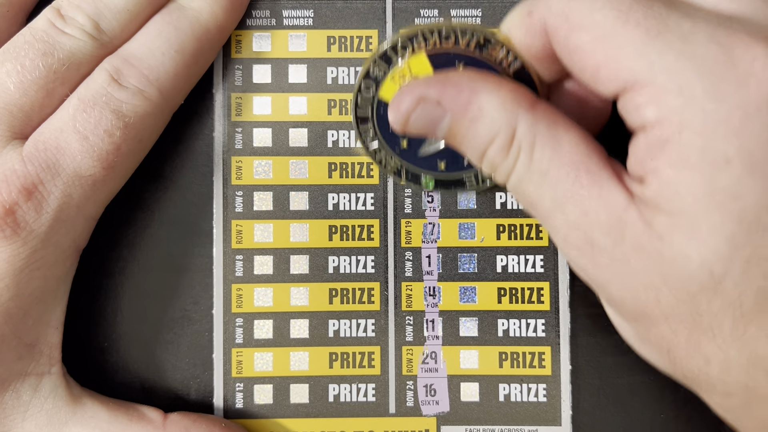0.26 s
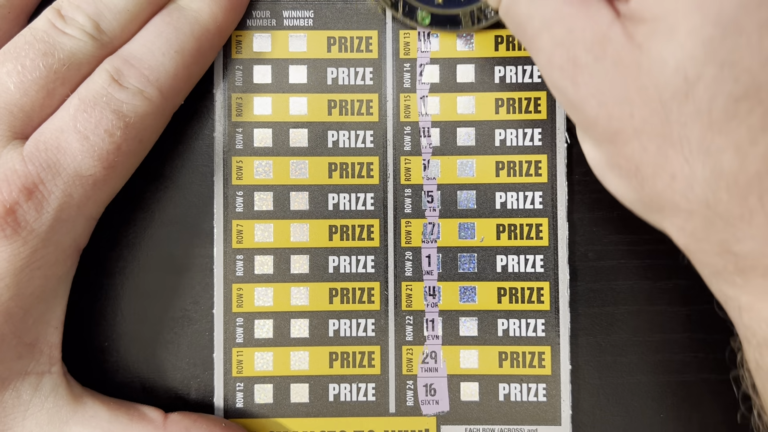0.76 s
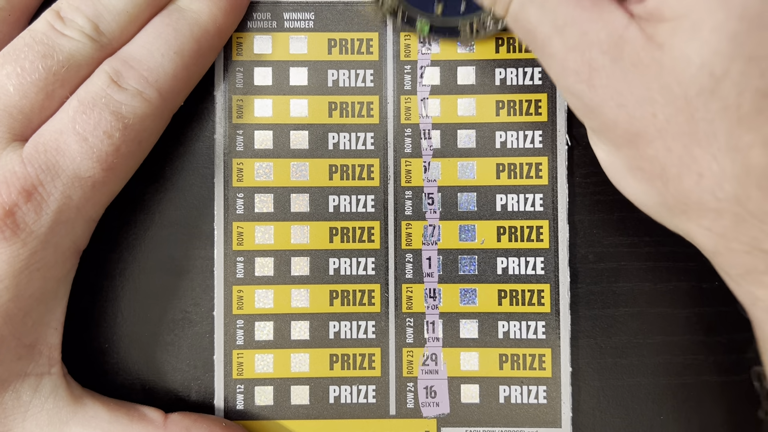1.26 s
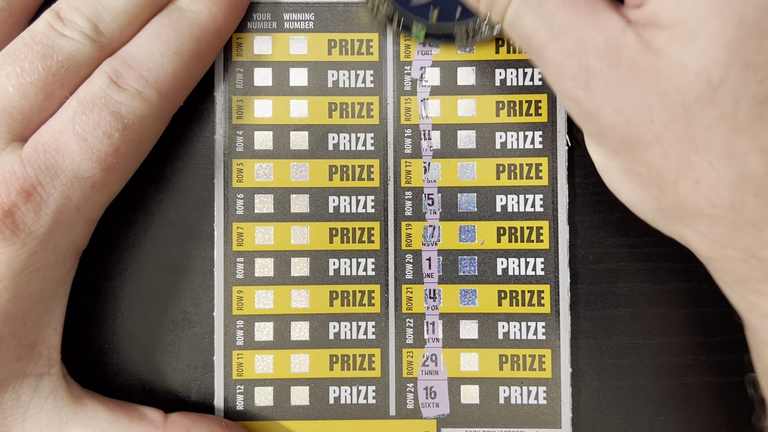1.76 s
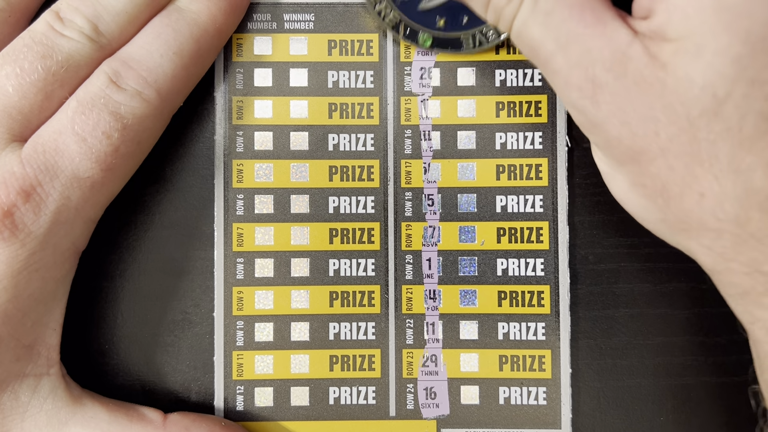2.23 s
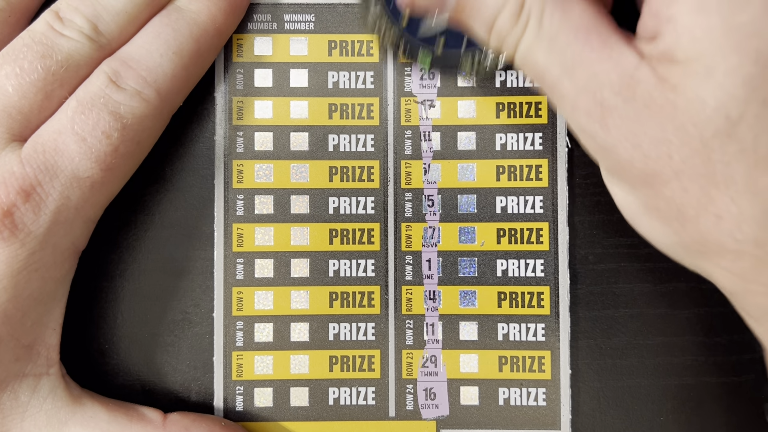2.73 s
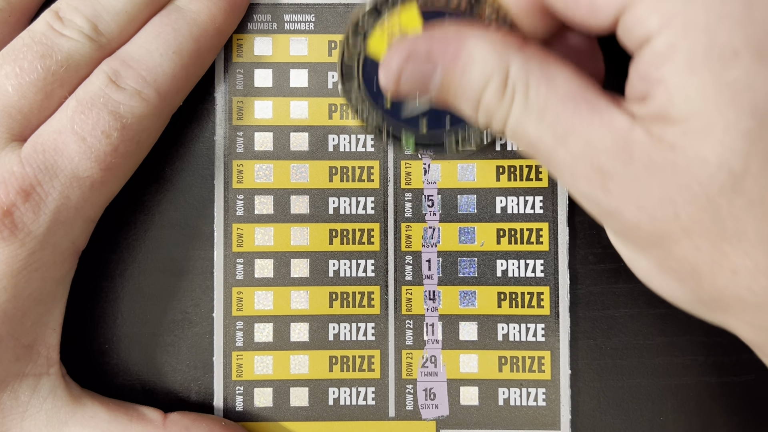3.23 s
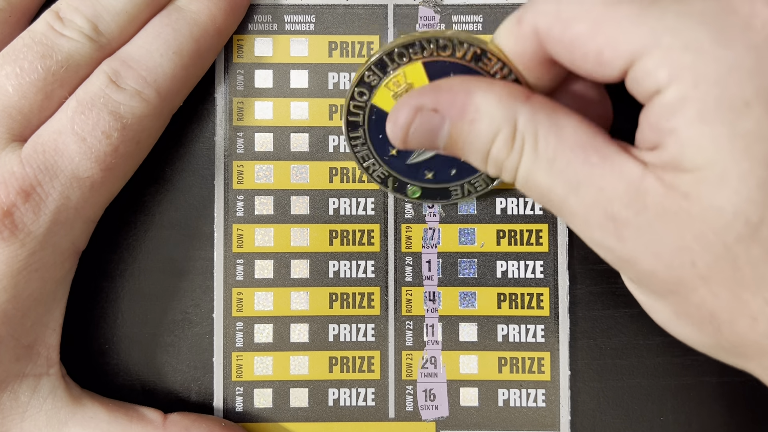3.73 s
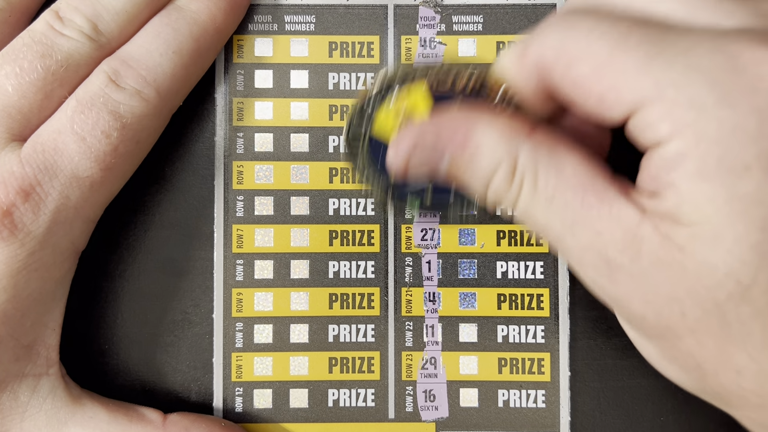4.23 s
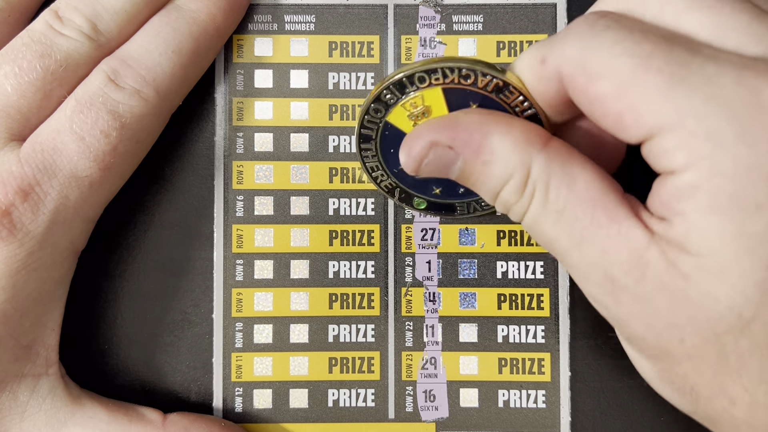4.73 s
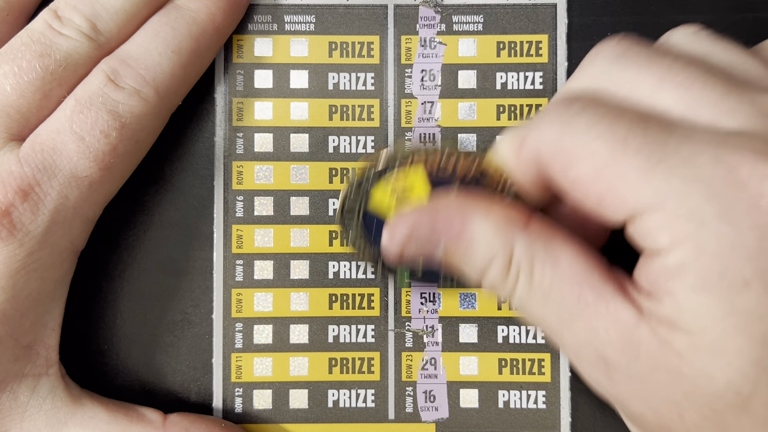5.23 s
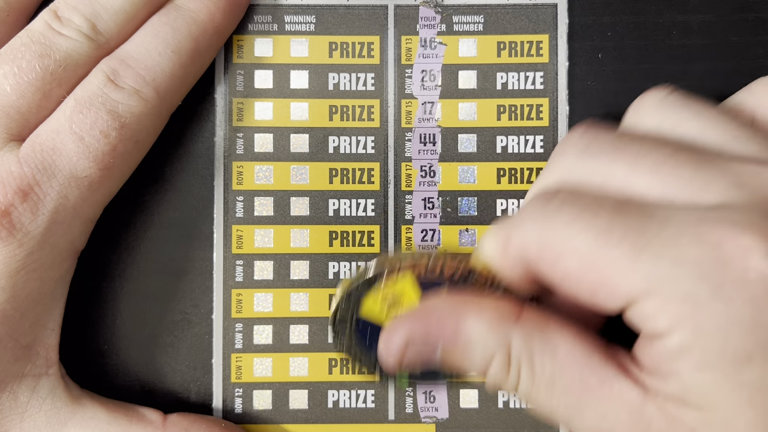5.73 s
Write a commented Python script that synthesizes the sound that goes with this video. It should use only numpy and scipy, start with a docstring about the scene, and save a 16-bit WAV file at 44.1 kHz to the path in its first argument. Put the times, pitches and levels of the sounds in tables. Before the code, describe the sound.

A coin scrapes across a scratch card in one long slide, pauses briefly, then scratches rapidly back and forth with small clicks.

```python
"""Coin on a scratch card

A large coin scrapes the coating off a card held flat on a table, close by in a small, quiet room:
one long slide up the card, a short rest, then push-pull strokes, about nine a second.
Stick-slip friction at the rim drives the modes of card and table; the coating fractures into fine
grit, whose impacts ring the coin. Now and then the rim snags, cracks off a flake and knocks."""
import sys
import numpy as np
from scipy import signal
from scipy.fft import rfft, irfft, next_fast_len
from scipy.io import wavfile
from scipy.ndimage import uniform_filter1d, map_coordinates

SR = 44100
rng = np.random.default_rng(int(sys.argv[2]) if len(sys.argv) > 2 else 0)


def generate_wav(signal):
    """Clip the signal to [-1, 1] and save it as 16-bit WAV at the path in sys.argv[1]."""
    frames = np.transpose(np.atleast_2d(signal))
    scaled = np.clip(frames, -1, 1) * 32767
    pcm = np.round(scaled).astype(np.int16)
    wavfile.write(sys.argv[1], SR, pcm)


N = 264371
TIME = np.arange(N) / SR
FFT_SIZE = next_fast_len(N + SR // 2)
FREQ = np.maximum(np.arange(FFT_SIZE // 2 + 1) * SR / FFT_SIZE, 1)
CUTOFF_HZ = 15900
WAYS = PUSH, PULL, SLIDE = 0, 1, 2

# Strokes, pull and push in turn, at relative levels: start_s, deepest_after_s, card_db, grit_db
STROKES = [(1.044, 0.011, -45.5, -60.5), (1.105, 0.076, -38.0, -52), (1.248, 0.026, -38, -51),
           (1.365, 0.045, -32.0, -52), (1.479, 0.036, -39, -51.0), (1.589, 0.051, -31.5, -44),
           (1.699, 0.062, -39.5, -53.5), (1.819, 0.051, -30, -49.5), (1.947, 0.023, -33.5, -46),
           (2.047, 0.045, -33, -47), (2.156, 0.064, -36.0, -47.5), (2.284, 0.034, -33, -43.5),
           (2.392, 0.067, -35, -44.5), (2.503, 0.048, -30, -44.5), (2.624, 0.028, -35, -47),
           (2.719, 0.064, -28.5, -46), (2.84, 0.037, -34, -43), (2.957, 0.063, -27.5, -45.5),
           (3.067, 0.03, -32.5, -44.0), (3.174, 0.059, -30, -41), (3.31, 0.031, -32.5, -49.5),
           (3.417, 0.043, -27.5, -42.5), (3.527, 0.027, -31.5, -38), (3.634, 0.056, -28, -45.5),
           (3.745, 0.048, -32.5, -45), (3.844, 0.06, -29.5, -41.5), (3.971, 0.014, -31.0, -43.5),
           (4.077, 0.062, -28, -41.5), (4.2, 0.016, -28.5, -41.5), (4.308, 0.053, -25, -43.5),
           (4.427, 0.03, -31.5, -50), (4.54, 0.059, -26.5, -47.5), (4.653, 0.055, -33.5, -46.5),
           (4.764, 0.064, -26.5, -45), (4.898, 0.02, -30, -50.5), (4.985, 0.066, -30, -42),
           (5.101, 0.063, -35.5, -42), (5.221, 0.07, -30, -44.5), (5.356, 0.024, -34.0, -45),
           (5.449, 0.063, -30, -47), (5.58, 0.052, -33, -48.5), (5.678, 0.053, -27.5, -52.5),
           (5.793, 0.026, -28.5, -49), (5.916, 0.045, -26.0, -53)]
# Place of the coin, down the card from its middle: time_s, offset_card_lengths
TRAVEL = [(0, 0), (1, -.5), (2.5, -.5), (6, .5)]


def scrape():
    """Friction excitation: slips and rubbing shake the card; each slip sheds grit that rings the coin."""
    direction, card_db, grit_db, upper_db, sparkle_db, ring_db, ring_hz = hand()
    jumps = slips(median_per_s=260, unevenness=.6, spread_db=5)
    force = rms_one(jumps) + from_db(-2) * grains(per_s=3000, spread_db=2.5)
    bursts = rms_one(decay(jumps, fade_s=.0069))
    crumbs = grains(per_s=25000, spread_db=2) * (.1 + .9 * bursts)
    card = card_rasp(force, direction, upper_db)
    grit = grit_hiss(crumbs, direction, sparkle_db)
    ring = coin_ring(crumbs, ring_hz, width_hz=130)
    bright = from_db(-1) * grit + from_db(ring_db + 1) * ring
    return from_db(card_db - .5) * card + from_db(grit_db) * bright


def slips(median_per_s, unevenness, spread_db):
    """Stick-slip motion: the rim jumps forward at uneven intervals and with uneven force."""
    interval, strength = rng.standard_normal((6000, 2)).T
    at = (np.cumsum(np.exp(unevenness * interval)) / median_per_s * SR).astype(int)
    heard = at < N
    return np.bincount(at[heard], from_db(spread_db * strength[heard]), N)


def hand():
    """Contact loading: direction, grip and depth of cut govern the level and colour of the friction."""
    # The long slide, at relative levels: time_s, card_db, grit_db, upper_modes_db, sparkle_db, ring_db
    long_slide = [(0.021, -66, -65.5, 1, -8, -17), (0.022, -31.5, -41.5, 4.5, -14, -16),
                  (0.086, -38, -59, -12, -14, -14), (0.206, -40.5, -56, -1, -7, -12),
                  (0.22, -35.5, -45, 1.5, -0.5, -7), (0.305, -31.5, -44.5, 6.5, -5.5, -18),
                  (0.36, -36, -51.5, 3.5, -3.5, -8), (0.604, -39.5, -59, 1, -5, -8.5),
                  (0.66, -36.5, -50.5, 4, -5, -4), (0.848, -39.5, -56.5, 2, -11, -3),
                  (0.876, -59, -76, 2, 1, -10), (1.03, -69.5, -91, 5, 2, -11)]
    # Colour of the grip on a push, then on a pull: upper_modes_db, sparkle_db, ring_db
    grip = [(-.5, -3.5, -10), (.5, -3, -8)]
    # Lean of the coin, which lowers its ring on a push and raises it otherwise: time_s, shift_hz
    lean = [(0.5, 20), (0.6, 180), (1.6, 180), (2.4, 62), (4.0, 26), (5.4, 150)]
    start_s, deepest_s, card_db, grit_db = np.transpose(STROKES)
    way = np.resize([PULL, PUSH], len(start_s))
    now = np.searchsorted(start_s, TIME) - 1
    sliding = now < 0
    direction = np.where(sliding, SLIDE, way[now])
    press_s = np.where(way == PUSH, .035, .042)
    hold_s = np.where(way == PUSH, .001, .013)
    upper_db, sparkle_db, ring_db = np.array(grip)[way].T
    depth_db = grit_db + 44  # a deeper cut than usual wakes the upper modes and the ring
    clean_db = grit_db - card_db + 9.5  # more grit over the card makes a stroke brighter
    strokes = [stroke_level(press_s, deepest_s + hold_s, card_db, dip_db=22, bite=5, ease=1.81),
               stroke_level(deepest_s, deepest_s + .0035, grit_db, dip_db=29, bite=2.95, ease=1.51),
               (upper_db + .42 * depth_db)[now],
               (sparkle_db + .37 * clean_db)[now],
               (ring_db + .23 * depth_db)[now]]
    slide_s, *slide = np.transpose(long_slide)
    card, grit, upper, sparkle, ring = (np.where(sliding, np.interp(TIME, slide_s, points), stroke)
                                        for points, stroke in zip(slide, strokes))
    patch = drift(per_s=60) * np.where(sliding, .5, 1)  # thick coating gives more and brighter grit
    ring_hz = 4233 + np.where(direction == PUSH, -1, 1) * over_time(lean)
    return direction, card, grit + 2 * patch, upper, sparkle + 3 * patch, ring, ring_hz


def stroke_level(rise_s, held_s, level_db, dip_db, bite, ease, last_turn_s=6.03):
    """Static and sliding friction: the coin sticks at each turn, breaks free, bites and slows; in dB."""
    starts = np.array(STROKES)[:, 0]
    lengths = np.diff(starts, append=last_turn_s)
    held = np.minimum(held_s, .85 * lengths)
    now = np.maximum(np.searchsorted(starts, TIME) - 1, 0)
    age = TIME - starts[now]
    building = np.clip(1 - age / rise_s[now], 0, 1) ** bite
    release = np.clip((age - held[now]) / (lengths - held)[now], 0, 1)
    slowing = np.sin(np.pi / 2 * release) ** ease
    return level_db[now] - dip_db * (building + slowing)


def card_rasp(force, direction, upper_db):
    """Forced vibration of card and table; further down the card it narrows to the middle modes."""
    card = sum((direction == way) * through(force, card_response(way, soft_hz=2450)) for way in WAYS)
    travel = over_time(TRAVEL)
    card = wander(card, share=.0226, per_s=14)
    card = shelf(card, corner_hz=750, high_db=upper_db)
    card = shelf(card, corner_hz=348, high_db=8 * travel)
    card = shelf(card, corner_hz=1070, high_db=18 * travel)
    return steady(shelf(card, corner_hz=1400, high_db=-30 * travel))


def card_response(way, soft_hz):
    """Modal superposition in card and table; the compliant paper low-passes the contact force."""
    # Modes of card and table: pitch_hz, width_hz, push_db, pull_db, slide_db
    card_modes = [(141.4,17.5,-7.5,-14,-8.5), (266.6,25.7,-5,-9.5,-8.5), (309.5,49.7,-3,-7.5,-7.5),
                  (429,64,-6.5,-10.5,-13.5), (520,47.7,-2.5,-7.5,-9.5), (628.6,54.7,2,-0.5,-6.5),
                  (706,72,-4,-2.5,-9.5), (820.6,45,-11,-7.5,-11), (979.4,104,-13,-8.5,-6),
                  (1116,166,-16,-13.5,-10), (1276,86,-21,-19.5,-18), (1486,83,-23.5,-18.5,-15.5),
                  (1926,285,-28.5,-27,-54)]
    modes = sum((-1) ** k * from_db(levels_db[way]) * resonance(hz, width_hz)
                for k, (hz, width_hz, *levels_db) in enumerate(card_modes))
    return rms_one(modes / (1 + 1j * FREQ / soft_hz) ** 2)


def grit_hiss(crumbs, direction, sparkle_db):
    """Fracture noise, whose brightness follows the cut, the place on the card and patches of coating."""
    grit = sum((direction == way) * through(crumbs, coin_response(way, low_hz=1545)) for way in WAYS)
    travel = over_time(TRAVEL)
    grit = wander(grit, share=.008, per_s=12)
    grit = shelf(grit, corner_hz=4300, high_db=sparkle_db)
    # further down the card the grit gathers in the middle of the treble
    grit = shelf(grit, corner_hz=3300, high_db=8 * travel)
    grit = shelf(grit, corner_hz=8000, high_db=-8.5 * travel)
    return steady(shelf(grit, corner_hz=10800, high_db=2.4 * drift(per_s=40)))


def coin_response(way, low_hz):
    """Resonant filtering: the coin's modes stand out of the broad spectrum of the grit."""
    # Spectrum of the crumbling coating: frequency_hz, density_db
    grit_spectrum = [(1200,13), (2200,2.5), (3700,-4.5), (5500,-3), (6800,-2.5), (8700,-6), (11000,-5),
                     (13000,-14), (16000,-6)]
    # Finger-damped coin modes, relative to the grit: pitch_hz, width_hz, push_db, pull_db, slide_db
    coin_modes = [(2597, 46, 11.5, 3, 1), (3230, 370, 2, -0.5, -17), (4780, 56, -15, 3, -3),
                  (7820, 350, 1.5, -16, -19), (9320, 280, 9, 10.5, 6), (12950, 800, 2, 0, -3),
                  (15300, 500, 5, 10, 1)]
    modes = sum(from_db(levels_db[way]) * resonance(hz, width_hz)
                for hz, width_hz, *levels_db in coin_modes)
    band = (FREQ < CUTOFF_HZ) / (1 + (low_hz / FREQ) ** 4)
    return rms_one(from_db(over_hz(grit_spectrum)) * (1 + modes) * band)


def coin_ring(crumbs, hz, width_hz):
    """A driven resonator: the coin's strongest mode, whose pitch follows the grip."""
    spin = np.exp(2j * np.pi * np.cumsum(hz) / SR)
    amplitude = signal.lfilter([1], [1, -np.exp(-np.pi * width_hz / SR)], crumbs / spin)
    return steady(np.real(spin * amplitude))


def snags():
    """Brittle fracture and impact: a flake cracks off, crumbs spray, the freed rim knocks on the card."""
    # The rim lands or catches on an edge of the coating, at relative levels: time_s, grit_db, card_db
    catches = [(0.0215, -43, -30.5), (0.3012, -30, -29), (1.4075, -36.5, -24), (1.6177, -31.5, -32),
               (1.9574, -35, -27), (2.7536, -39, -13.5), (2.9986, -35, -24), (3.1952, -35.5, -34),
               (3.4634, -31, -20), (3.5378, -32, -46), (3.8836, -31, -17.5), (4.124, -26.5, -10.5),
               (4.2384, -56, -17), (4.361, -32.5, -14.5), (4.5774, -50, -12.5), (4.6837, -36, -21.5),
               (4.8232, -35, -36), (5.015, -47, -14), (5.2714, -30, -14.5), (5.502, -30.5, -23),
               (5.5964, -31, -22.5), (5.6199, -34.5, -32), (5.7114, -32.5, -15.5), (5.8364, -36, -14),
               (5.9476, -46, -12.5)]
    cracks, knocks = np.zeros((2, N))
    for time_s, grit_db, card_db in catches:
        cracks[round(time_s * SR)] = from_db(grit_db - 8)
        knocks[round(time_s * SR)] = from_db(card_db + 15)
    crack = decay(cracks, fade_s=.0058)
    spray = from_db(-15) * decay(cracks, fade_s=.034)
    flakes = (crack + spray) * grains(per_s=25000, spread_db=5)
    crunch = through(flakes, coin_response(PUSH, low_hz=1080))
    return crunch + through(knocks, card_response(PUSH, soft_hz=4160))


def direct_sound(x):
    """Phase and level differences: each frequency reaches left and right with its own lead and balance."""
    # Phase by which the left side leads: frequency_hz, lead_rad
    lead = [(680, .05), (820, 1.2), (960, -.1), (1580, 1.8), (1760, 0), (2300, -.1), (2800, 1), (4700, .2),
            (5500, -1), (6400, 0), (7400, -.2), (9600, -2.9), (10400, -3.3), (12400, -6.2), (13400, -6.4),
            (15600, -9.4)]
    # Level of the left side over the right: frequency_hz, difference_db
    balance = [(300, 0.5), (450, 3.5), (610, 1), (760, -10), (950, 7.5), (1550, -4.5), (1900, 1.5),
               (4800, 2.5), (5900, 4.5), (7000, 1), (10000, -0.5)]
    left = from_db(over_hz(balance) / 2) * np.exp(.5j * over_hz(lead))
    return through(x, np.array([left, 1 / left]))


def nearby_echoes(x, fade_s, dull_hz, moves_per_s):
    """Scattering from hands and table: early echoes whose pattern shifts as the hand moves."""
    t = TIME[:SR // 40]
    pose = np.pi / 2 * drift(moves_per_s)
    colour = FREQ / (FREQ + 300) / (1 + 1j * FREQ / dull_hz)
    echoes = 0
    for share in (np.cos(pose), np.sin(pose)):
        scatter = rng.standard_normal((2, len(t))) * np.exp(-t / fade_s) * (t > .001)
        echoes = echoes + through(x * share, rms_one(rfft(scatter, FFT_SIZE)) * colour)
    return echoes


def room(x, t60_s, dull_hz):
    """Diffuse reverberation: dull reflections that decay exponentially, different on each side."""
    t = TIME[:SR // 3]
    tail = rng.standard_normal((2, len(t))) * from_db(-60 * t / t60_s) * (t > .003)
    tail /= np.sqrt(np.sum(tail ** 2, axis=1, keepdims=True))
    return through(x, rfft(tail, FFT_SIZE) / (1 + 1j * FREQ / dull_hz))


def rumble():
    """Low-frequency noise of the room and the hands on the table, nearly coherent on the two sides."""
    # Spectrum of the rumble: frequency_hz, density_db
    spectrum = [(20, -20), (40, -10.5), (62, 4.5), (85, -4.5), (120, 6.5), (200, -3.5), (350, -10),
                (600, -27), (1000, -33), (1500, -26), (2300, -38), (15000, -100)]
    # Its relative level, least while the hands rest: time_s, level_db
    swell = [(0.15, -58), (0.67, -52.5), (0.88, -64), (1.0, -59.5), (1.06, -52.5), (1.35, -60),
             (1.8, -55.5), (5.2, -54.5), (5.3, -48.5), (5.39, -56)]
    mid, side = rms_one(through(rng.standard_normal((2, N)), from_db(over_hz(spectrum))))
    level = from_db(over_time(swell) + 5.5)
    return level * (mid + from_db(-18) * side * np.array([[1], [-1]]))


def grains(per_s, spread_db):
    """Shot noise: random clicks, many small and a few large; rms 1."""
    sizes = from_db(spread_db * np.minimum(rng.exponential(1, N), 4)) * rng.choice([-1, 1], N)
    return rms_one(sizes * (rng.random(N) < per_s / SR))


def wander(x, share, per_s):
    """Frequency modulation: modes waver in pitch as the contact point and the grip move."""
    ahead = signal.lfilter([1], [1, -np.exp(-30 / SR)], share * drift(per_s))
    return map_coordinates(x, [np.arange(N) + ahead], order=3, mode="mirror")


def drift(per_s):
    """Slow noise: random values joined by straight lines; spread about 1."""
    return np.interp(TIME * per_s, np.arange(2000), rng.standard_normal(2000))


def decay(impulses, fade_s):
    """Exponential decay after each impulse."""
    return signal.lfilter([1], [1, -np.exp(-1 / (fade_s * SR))], impulses + 1e-18)


def resonance(hz, width_hz):
    """Response of a damped oscillator, with gain 1 at its peak."""
    return 1 / (1 + 1j * (FREQ ** 2 - hz ** 2) / (FREQ * width_hz))


def shelf(x, corner_hz, high_db):
    """Shelving filter: a time-varying gain above a corner frequency."""
    low = through(x, 1 / (1 + (FREQ / corner_hz) ** 8))
    return low + from_db(high_db) * (x - low)


def steady(x, window_samples=600):
    """Power normalisation: the local mean stays near 1 while faster texture remains."""
    power = uniform_filter1d(uniform_filter1d(x * x, window_samples), window_samples)
    return x / np.sqrt(np.maximum(power, 0) + 1e-12)


def through(x, response):
    """Linear filtering by a frequency response."""
    return irfft(rfft(x, FFT_SIZE) * response, FFT_SIZE)[..., :N]


def over_hz(points):
    """Interpolation of (frequency_hz, value) points on a logarithmic axis."""
    hz, value = np.transpose(points)
    return np.interp(np.log(FREQ), np.log(hz), value)


def over_time(points):
    """Linear interpolation of (time_s, value) points."""
    return np.interp(TIME, *np.transpose(points))


def rms_one(x):
    """Normalisation to an rms of 1."""
    return x / np.sqrt(np.mean(np.abs(x) ** 2) + 1e-20)


def from_db(db):
    """Decibels to amplitude ratio."""
    return 10 ** (np.asarray(db) / 20)


def scene():
    """Superposition of the coin's direct sound, its reflections and the low rumble."""
    coin = scrape() + snags()
    echoes = from_db(-9.5) * nearby_echoes(coin, fade_s=.005, dull_hz=6000, moves_per_s=9)
    reverberation = from_db(-14) * room(coin, t60_s=.2, dull_hz=7000)
    return direct_sound(coin) + echoes + reverberation + rumble()


def record(dry):
    """Band limiting: a steep low-pass filter removes the highest treble."""
    return signal.sosfilt(signal.ellip(12, .1, 80, CUTOFF_HZ, fs=SR, output="sos"), dry)


dry = scene()
out = record(dry)
generate_wav(out)
```